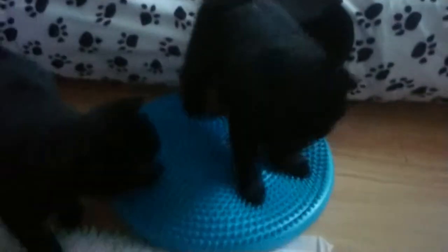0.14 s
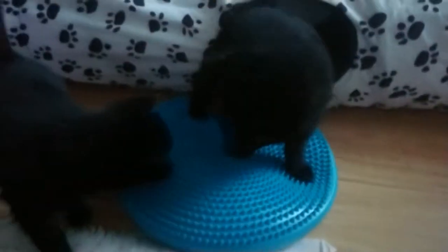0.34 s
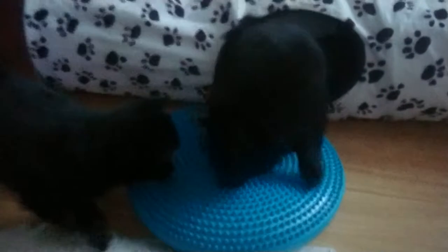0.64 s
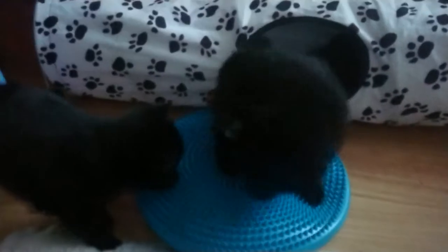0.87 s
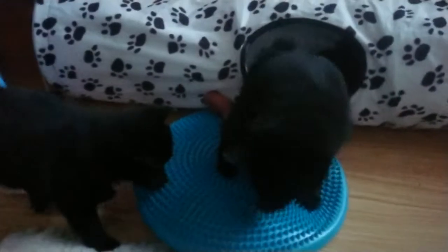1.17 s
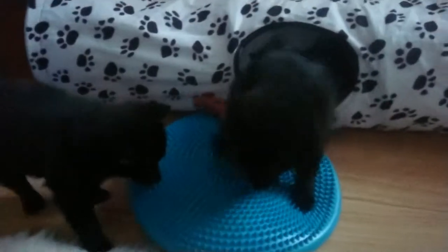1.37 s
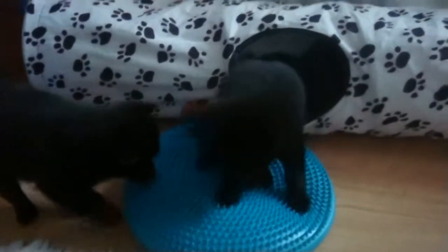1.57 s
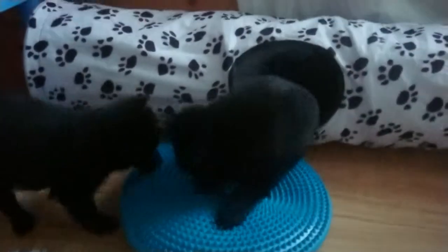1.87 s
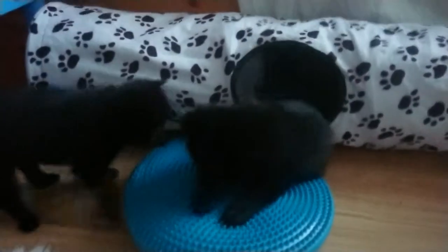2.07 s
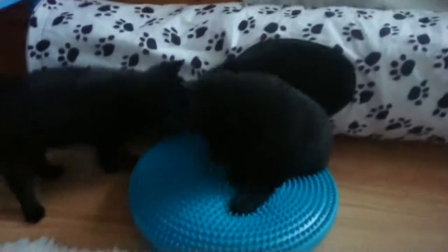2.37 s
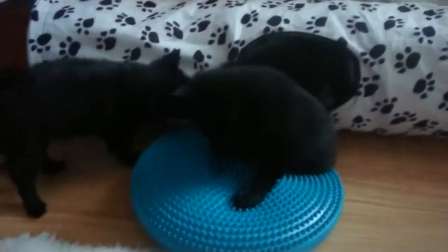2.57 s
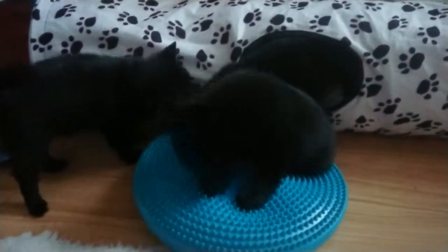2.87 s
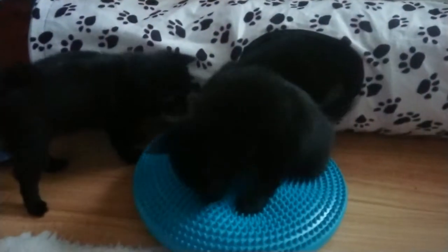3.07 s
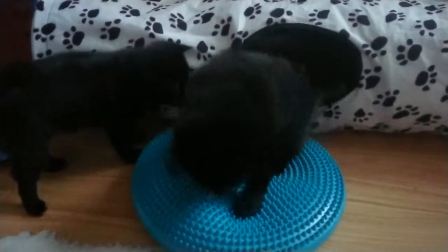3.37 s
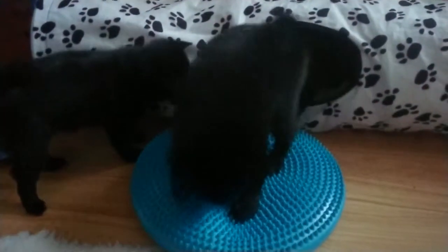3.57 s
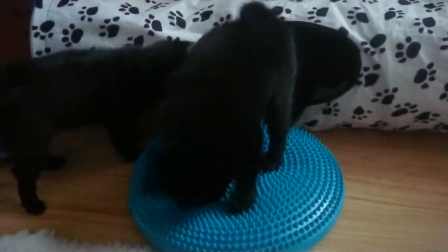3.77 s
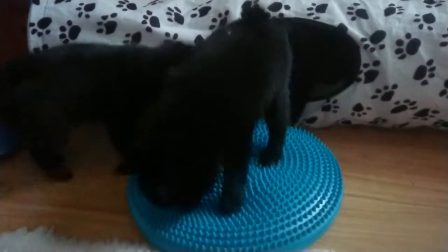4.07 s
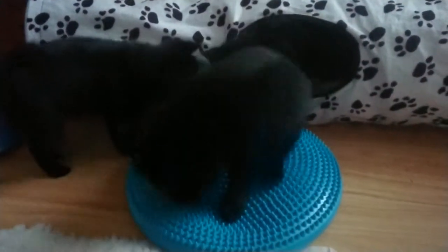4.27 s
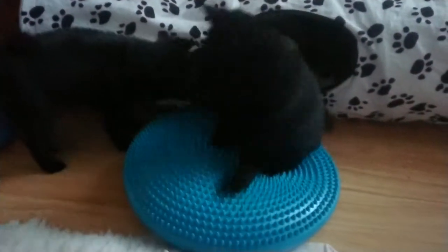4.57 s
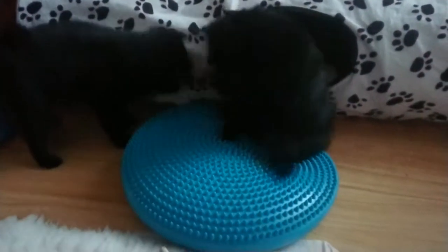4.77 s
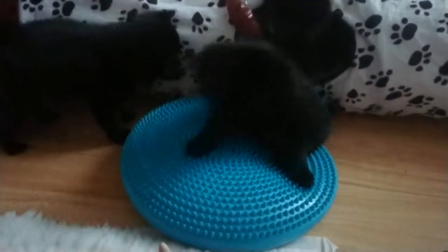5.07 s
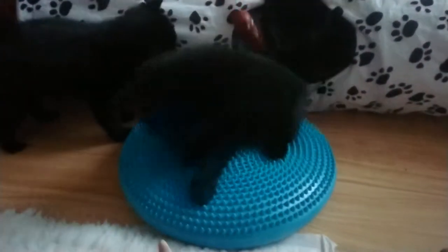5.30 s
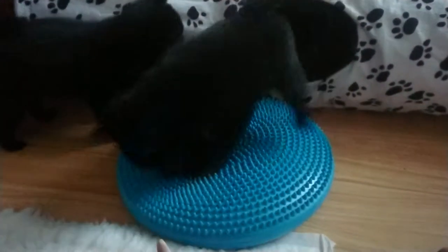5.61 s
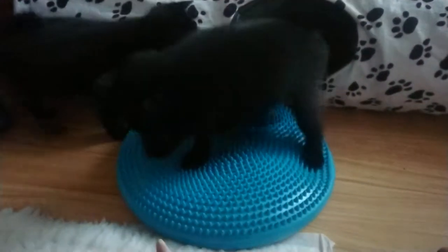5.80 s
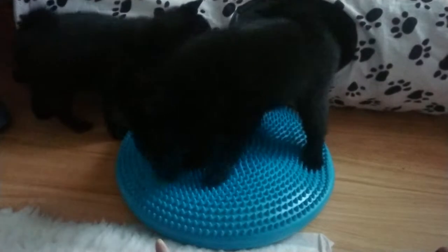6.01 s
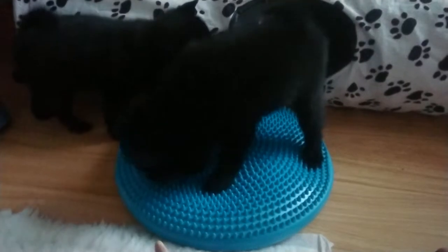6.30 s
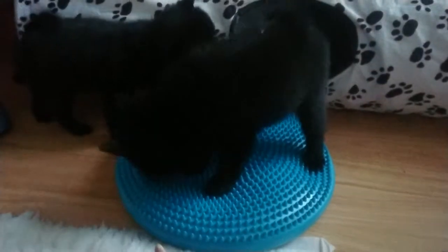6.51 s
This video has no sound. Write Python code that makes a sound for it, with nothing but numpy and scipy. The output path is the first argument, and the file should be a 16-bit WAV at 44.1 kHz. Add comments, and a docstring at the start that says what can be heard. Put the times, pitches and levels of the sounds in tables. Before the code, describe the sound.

Two kittens brush against a crinkly fabric tunnel, making uneven swells of rustling with small crisp snaps. Soft hollow thumps come in clusters as the tunnel wall gives way, and claws briefly rasp on a knobbly rubber cushion. The wooden floor gives a faint knock past the middle and a loud one near the end. The microphone is close, in a small quiet room.

```python
"""Cloth rustles and snaps, with soft thumps, as two small pets brush against a crinkly fabric tunnel.
Friction flips creases in the fabric, and its taut wall buckles and pushes the air. Claws rasp over
a knobbly rubber cushion; the wooden floor rings with a faint knock and, near the end, a loud one.
The small quiet room is heard through two close microphone ports."""
import sys
import numpy as np
from scipy import signal
from scipy.fft import rfft, irfft
from scipy.io import wavfile

SR = 44100
rng = np.random.default_rng(int(sys.argv[2]) if len(sys.argv) > 2 else 0)


def master_out(mix):
    """Clip the mix to full scale and print it as 16-bit PCM to the path in sys.argv[1]."""
    frames = np.transpose(np.atleast_2d(mix))
    ceiling = np.clip(frames, -1, 1)
    pcm = np.round(ceiling * 32767).astype(np.int16)
    wavfile.write(sys.argv[1], SR, pcm)


N = 293265

# the tunnel wall buckles under a paw or a flank: (time [s], relative level [dB], push width [ms])
BUCKLES = [(.024, -44, 1.5), (.278, -45, 1.6), (0.31, -44, 1.7), (.368, -47, 1.5), (.459, -46.5, 0.99),
           (1.227, -36, .7), (1.243, -30, .75), (1.292, -34.5, 0.93), (1.303, -27.5, .8), (1.64, -32, 0.89),
           (1.667, -32.5, 0.83), (1.705, -33.5, 1.14), (1.801, -30.5, 1.2), (1.814, -32, 0.88),
           (1.878, -27, 1), (1.888, -26, 0.84), (1.917, -30.5, .91), (1.946, -30.5, 0.77),
           (1.965, -30.5, 0.67), (2.212, -31, .68), (2.313, -22, 0.73), (2.327, -33, 1.4),
           (2.363, -26.5, 0.93), (2.404, -24, 0.88), (2.428, -30, 0.73), (2.507, -26.5, 0.94),
           (3.03, -28, 0.68), (3.055, -25.5, 0.95), (3.084, -41, 1.3), (3.374, -37, 0.81),
           (3.415, -35, 1.15), (3.454, -34, 1.2), (3.507, -32, 0.74), (3.697, -38.5, 1.15),
           (5.195, -31, 1.75), (5.232, -36.5, 2.1), (5.553, -29, 0.69), (5.629, -35, 1.4), (5.72, -29, 2.5),
           (5.732, -28, 2.6), (5.748, -32, 2.5), (6.219, -38.5, 1.1)]
# spectra of the cloth's bright crinkle and dull crumple: (frequency [Hz], gain [dB])
CRINKLE = [(200, -12), (700, -18.5), (1500, -9), (2400, -1), (3600, -4.5), (5300, 1.5), (7000, -1.5),
           (11000, 0.5), (16000, -6.5)]
CRUMPLE = [(150, -14.5), (450, -1), (660, -13), (830, -3), (1100, -6), (1500, -2.5), (2100, 2),
           (3000, -4.5), (4500, -6), (9000, -25)]


def from_db(db):
    """Amplitude ratio of a level in decibels."""
    return 10 ** (np.asarray(db) / 20)


def rms_one(x):
    """Normalisation to unit mean power."""
    return x / np.sqrt(np.mean(x ** 2) + 1e-20)


def in_time(points):
    """Linear interpolation of a curve at every sample."""
    return np.interp(np.arange(N) / SR, *np.transpose(points))


def at_bins(points, size):
    """Interpolation of a spectrum over log frequency, at the bins of a transform."""
    hz, value = np.transpose(points)
    return np.interp(np.log(np.fft.rfftfreq(size, 1 / SR) + 1), np.log(hz), value)


def add(track, s, sound):
    """Superposition of a sound on a track, from s seconds on."""
    start = max(round(s * SR), 0)
    span = track[..., start:start + sound.shape[-1]]
    span += sound[..., :span.shape[-1]]


def convolve(x, response):
    """Linear filtering: convolution with one or two impulse responses."""
    return signal.oaconvolve(np.atleast_2d(x), np.atleast_2d(response), axes=1)[:, :N]


def passband(x, order, hz, kind):
    """Filtering with a maximally flat pass band."""
    return signal.sosfilt(signal.butter(order, hz, kind, fs=SR, output="sos"), x)


def colour(x, points, size=8192):
    """Minimum-phase filtering: folding the cepstrum makes the given spectrum causal."""
    cepstrum = irfft(np.log(from_db(at_bins(points, size))))
    cepstrum[1:size // 2] *= 2
    cepstrum[size // 2 + 1:] = 0
    return convolve(x, irfft(np.exp(rfft(cepstrum))))


def ring(x, hz, t60):
    """Damped resonator: a unit impulse starts a decaying sine of height 1."""
    radius, angle = from_db(-60 / (t60 * SR)), 2 * np.pi * hz / SR
    return signal.lfilter([0, np.sin(angle)], [1, -2 * radius * np.cos(angle), radius ** 2], x + 1e-18)


def drift(per_s):
    """Random modulation of rms 1: straight lines between random values."""
    knots = rng.standard_normal(4000)
    return rms_one(np.interp(np.arange(N) / SR * per_s, np.arange(len(knots)), knots))


def clicks(per_s, spread_db):
    """Shot noise: random impulses of uneven size, scaled so that power is independent of rate."""
    sizes = from_db(spread_db * np.minimum(rng.exponential(1, N), 3)) * rng.choice([-1, 1], N)
    return sizes * (rng.random(N) < per_s / SR) / np.sqrt(per_s)


def stereo_noise(size):
    """Partial coherence: white noise, alike at both ports in the bass, nearly unrelated in the treble."""
    # left-right likeness of the sound field: (frequency [Hz], correlation [0-1])
    likeness = [(50, 0.45), (300, 0.85), (640, 0.6), (1400, 0.43), (3000, 0), (16000, 0.16)]
    alike = np.clip(at_bins(likeness, size), 0, 1)
    mid, side = rfft(rng.standard_normal((2, size)))
    return irfft(np.sqrt(1 + alike) * mid + np.sqrt(1 - alike) * side * [[1], [-1]], size)


def room_hush(level_db):
    """Stationary noise: the quiet room's background, strongest in the bass."""
    # spectrum of the hush: (frequency [Hz], relative level [dB])
    spectrum = [(20, -20), (35, -12), (51, 10), (63, -6), (80, 4.5), (105, -7.5), (140, -14.5), (250, -15),
                (450, -20.5), (700, -22), (2000, -18), (6000, -22), (16000, -59)]
    return from_db(level_db) * rms_one(colour(stereo_noise(N), spectrum))


def room(x, wet_db, gap_s, t60=0.15, size=16384):
    """Reverberation: reflections follow the direct sound after a gap and decay exponentially."""
    t = np.arange(size) / SR
    tail = stereo_noise(size) * from_db(-60 * t / t60) * (t > gap_s)
    return x + from_db(wet_db) * convolve(x, rms_one(tail) / np.sqrt(size))


def floor_knocks():
    """Modal vibration: a hard contact sets the floor boards ringing."""
    # blows on the floor: (time [s], level [dB])
    knocks = [(3.8721, -18), (6.2069, -3)]
    # modes of the boards: (frequency [Hz], gain [dB], t60 [s])
    modes = [(96, -40, 0.3), (350, -48, 0.051), (822, -34.5, 0.11), (884, -29.5, 0.019), (1020, -40, 0.044),
             (1380, -42, 0.057), (2150, -41, 0.095), (2470, -62, .05)]
    blows = np.zeros(N)
    for s, db in knocks:
        add(blows, s, from_db([db]))
    return sum(from_db(db) * ring(blows, hz, t60) for hz, db, t60 in modes)


def claw_rasps(fade_db, drag_db, ring_t60=.007, size=1024):
    """Repeated impact: a claw catches knob after knob, ringing ever weaker and mostly lower."""
    # rasps: (time [s], length [s], level [dB], start pitch [Hz], end pitch [Hz], catch rate [1/s])
    rasps = [(0.763, 0.11, -30.5, 2300, 2320, 75), (1.033, 0.071, -36, 2120, 1900, 47),
             (2.162, .06, -29, 2050, 1970, 127), (3.141, 0.096, -43, 2470, 2300, 99),
             (3.902, 0.08, -31.5, 1970, 1870, 100), (4.038, 0.049, -34.5, 1370, 1120, 80),
             (5.759, 0.032, -32, 1920, 1700, 146), (5.842, 0.039, -28, 1710, 1500, 100)]
    out = np.zeros(N)
    for s, length, db, start_hz, end_hz, per_s in rasps:
        chance = rng.standard_normal((20, 3))
        drags = rng.standard_normal((20, size)) * np.linspace(1, 0, size) ** 2
        for k, (late, loud, sharp) in enumerate(chance):
            done = k / per_s / length
            if done < 1:
                hz = (start_hz + done * (end_hz - start_hz)) * (1 + .04 * sharp)
                catch = ring(signal.unit_impulse(size) + from_db(drag_db) * drags[k], hz, ring_t60)
                add(out, s + (k + 0.0964 * late) / per_s, catch * from_db(db - fade_db * done + 2 * loud))
    return passband(out, 2, 900, "high")


def trembling(tremble_db, strain_db=-20, build_s=0.014, settle_s=0.023):
    """Power addition: the wall's amplitude from rubbing and from the strain around each buckle."""
    t, power = np.arange(N) / SR, from_db(tremble_db) ** 2
    for s, db, _ in BUCKLES:
        away = np.maximum((s - t) / build_s, (t - s) / settle_s)
        near = away < 10
        power[near] += from_db(db + strain_db) ** 2 * np.exp(-away[near])
    return np.sqrt(power)


def wall_thumps(tremble_db, buckle_db, leak_hz, flutter_hz):
    """Buckling: the trembling wall gives way, pushing and pulling the air once and exciting resonances."""
    # resonances of the tunnel and the room: (frequency [Hz], gain [dB], t60 [s])
    modes = [(75, 5, 0.94), (146.7, 6, 0.6), (258, -3.5, .22), (364, -1.5, 0.14), (404.3, -3.5, 0.075),
             (818, 13, 0.16)]
    out, ms = np.zeros(N), np.arange(-441, 442) / SR * 1000
    for s, db, width_ms in BUCKLES:
        u = ms / width_ms
        add(out, s + ms[0] / 1000, -from_db(db + buckle_db) * u / (1 + u * u / 5) ** 3)
    flutter = passband(clicks(per_s=260, spread_db=4.5), 4, flutter_hz, "low")
    out += rms_one(flutter) * trembling(tremble_db)
    out = passband(out, 2, leak_hz, "high")  # the deepest part leaks from the open tunnel
    boom = sum(from_db(db) * 2 * np.log(1000) / (t60 * SR) * ring(out, hz, t60) for hz, db, t60 in modes)
    return out + boom


def rubbing(edge_db=19.5, roundness=1.53):
    """Incoherent sum: leaning and strokes add in power to give crinkle, crumple and tremble levels."""
    # steady rustle of a body leaning on the tunnel: (time [s], level [dB])
    leaning = [(0, -54), (.45, -52), (.95, -47.5), (1.35, -51), (1.66, -39.5), (2.05, -38.5), (2.45, -40.5),
               (2.62, -47), (3.08, -50), (3.27, -45.5), (3.72, -45.5), (3.82, -55.5), (4.15, -56.5),
               (4.55, -58.5), (5.02, -43), (5.7, -43.5), (5.8, -48), (6.65, -53.5)]
    # a paw or a flank brushes the cloth: (peak time [s], swell [s], fade [s], crinkle level [dB],
    # crumple re crinkle [dB], wall tremble re crinkle [dB])
    strokes = [(.025, 0.061, 0.08, -43.5, -31, -29), (.21, 0.11, 0.054, -39.5, -13.5, -21),
               (.4, 0.29, 0.19, -56.5, -22, -6.5), (.54, 0.16, 0.13, -43.5, -31, -24),
               (.78, 0.11, 0.15, -39, -9, -17.5), (.86, 0.067, .06, -41.5, 0, -22),
               (.96, .07, .07, -51, -12, -5.5), (1.12, 0.12, 0.34, -44.5, -3.5, -13),
               (1.582, 0.24, 0.063, -39, -14, -17), (2.178, 0.1, 0.15, -34.5, -13.5, -31),
               (2.369, 0.26, .1, -36.5, -8.5, -25), (2.51, 0.038, 0.036, -39, -3, -17),
               (2.659, .05, 0.06, -46.5, -1, -20), (2.859, 0.069, 0.14, -41, -10, -16.5),
               (3.212, .08, 0.043, -48, -9.5, -28), (3.381, .17, 0.092, -41, -5.5, -19),
               (3.75, 0.038, 0.087, -46.5, -8, -18), (3.89, 0.034, 0.2, -45, -4.5, -11),
               (4.28, .11, 0.13, -50.5, -6.5, -11), (4.43, 0.11, 0.1, -46.5, -5, -10.5),
               (4.6, 0.012, .09, -46.5, -8, -13.5), (4.761, 0.16, .07, -42.5, -6.5, -25),
               (4.898, 0.026, 0.043, -43.5, -21, -27), (5.139, 0.17, 0.066, -34, -7.5, -16),
               (5.281, 0.021, 0.077, -44.5, -10, -27), (5.459, .03, 0.2, -39.5, -11.5, -12),
               (5.681, 0.2, .11, -37.5, -10.5, -6), (5.859, 0.035, 0.05, -42, -7, -7),
               (5.988, 0.073, 0.27, -45, -9, -12.5), (6.12, 0.02, 0.059, -42, -11, -14),
               (6.219, 0.017, 0.082, -39.5, -6, -13), (6.52, 0.24, .06, -51, -2.5, -13.5)]
    t = np.arange(N) / SR
    power = from_db(in_time(leaning) + np.array([[0], [-6], [-16.5]])) ** 2  # crinkle, crumple, tremble
    for s, swell_s, fade_s, db, crumple_db, tremble_db in strokes:
        away = np.maximum((s - t) / swell_s, (t - s) / fade_s)
        near = away < 2
        stroke_db = db - edge_db * away[near] ** roundness
        power[:, near] += from_db(stroke_db + np.array([[0], [crumple_db], [tremble_db]])) ** 2
    return 10 * np.log10(power)


def crack(decay_ms, size=2048):
    """Snap-through: one crease flips and radiates a brief burst of noise."""
    u = np.arange(size) / SR * 1000 / decay_ms
    return stereo_noise(size) * np.exp(-u) * (.5 + u)


def crease_snaps(rubbing_db, large_db, body_db, small_per_s=40):
    """Elastic release: large creases flip singly and shake the cloth; small ones flip at random."""
    # large creases: (time [s], relative level [dB], decay [ms])
    snaps = [(0.031, -27.5, 0.84), (0.214, -27.5, 0.44), (0.46, -39, 0.74), (0.527, -33, 2.8),
             (0.8511, -21.5, 1.1), (1.619, -29, .69), (1.741, -22, .4), (2.016, -41, 0.45),
             (3.437, -24, 0.69), (3.642, -24.5, .8), (3.846, -33.5, .54), (3.8717, -21, 2.4),
             (3.874, -23.5, 1.9), (3.881, -32, .84), (3.888, -32, 1.5), (4.1995, -33.5, 1),
             (4.243, -31, 0.76), (4.289, -26.5, 0.48), (4.423, -28, 0.67), (4.438, -30, .78),
             (4.563, -36.5, 1), (4.5899, -32.5, 1.2), (5.835, -30, 0.67), (6.127, -27, 2.3),
             (6.209, -28.5, 3.7), (6.374, -32.5, 1.9), (6.644, -27, .58)]
    out = np.zeros((2, N))
    for s, db, decay_ms in snaps:
        add(out, s, from_db(db + large_db) * crack(decay_ms))
    for i in rng.integers(0, N, round(small_per_s * N / SR)):
        small_db = rubbing_db[i] + 5.5 + 2 * rng.standard_normal()
        add(out, i / SR, from_db(small_db) * crack(decay_ms=0.32))
    return colour(out, CRINKLE) + from_db(body_db) * colour(out, CRUMPLE)


def folds(flips, low_hz, high_hz, wander_db, count=12):
    """Impulse excitation: each flip sounds one fold, with its own octave band and wandering level."""
    fold, out = rng.integers(0, count, N), 0
    for k, hz in enumerate(np.geomspace(low_hz, high_hz, count)):
        octave = [hz / np.sqrt(2), min(hz * np.sqrt(2), .45 * SR)]
        burst = passband(crack(decay_ms=np.sqrt(500 / hz)), 1, octave, "band")
        voice = rms_one(burst) * np.sqrt(hz)
        out = out + convolve(flips * (fold == k) * from_db(wander_db * drift(per_s=22)), voice)
    return rms_one(out)


def cloth_rustle(crinkle_db, crumple_db, per_s, crowding, catch_db, hiss_db, bright_db):
    """Stick-slip friction: cloth catches and lets go over a hiss; harder rubbing flips more creases."""
    flip_rate = per_s * from_db(crowding * (crinkle_db - np.median(crinkle_db)))
    catching = from_db(catch_db * drift(per_s=130))
    fine = folds(clicks(flip_rate, spread_db=3.0), low_hz=2020, high_hz=14900, wander_db=5.0)
    fine = rms_one(catching * (fine + from_db(hiss_db) * stereo_noise(N)))
    coarse = folds(clicks(flip_rate, spread_db=2.0), low_hz=482, high_hz=2640, wander_db=3.0)
    crinkle = colour(fine * from_db(crinkle_db + bright_db), CRINKLE)
    crumple = rms_one(colour(coarse * catching, CRUMPLE)) * from_db(crumple_db)
    return crinkle + crumple


def scene():
    """Superposition: cloth, thumps, claws and knocks reverberate in the room, over its hush."""
    crinkle_db, crumple_db, tremble_db = rubbing()
    cloth = cloth_rustle(crinkle_db, crumple_db, per_s=2600, crowding=.6,
                         catch_db=1.26, hiss_db=-1, bright_db=2.5)
    cloth = room(cloth, wet_db=-13, gap_s=.004)
    thumps = wall_thumps(tremble_db, buckle_db=4.5, leak_hz=102, flutter_hz=411)
    thumps = room(thumps, wet_db=-9.5, gap_s=0.0114)
    hush = room_hush(level_db=-61.5)
    contacts = floor_knocks() + claw_rasps(fade_db=10.5, drag_db=-22.5)
    contacts = contacts + crease_snaps(crinkle_db, large_db=-3.5, body_db=-4)
    return hush + room(contacts, wet_db=-6, gap_s=0.0062) + thumps + cloth


def record(dry):
    """Port resonance colours each channel; the right starts dull, and both are band-limited."""
    # responses of the two ports: (frequency [Hz], gain [dB])
    left_port = [(500, 0.5), (1800, -1.5), (4000, 3), (5200, 2.5), (5850, 6), (6500, 2.5), (8000, 2.5),
                 (10500, -1), (12000, -10.5), (14000, 2.5), (15700, -11)]
    right_port = [(500, -3.5), (1000, -4), (2100, 2), (4000, 5), (5350, 3.5), (5950, -9), (6600, 0.5),
                  (9500, 1), (11300, -0.5), (13700, 10.5), (15700, 6)]
    # the treble on the right opens up: (time [s], level [dB])
    right_treble = [(0, -11.5), (.45, -9), (.6, -5.5), (1.05, -3.2), (1.3, -2.6)]
    left, right = colour(dry[0], left_port), colour(dry[1], right_port)
    muffled = passband(right, 1, 3000, "low")
    right = muffled + from_db(in_time(right_treble)) * (right - muffled)
    heard = passband(np.vstack([left, right]), 4, 40, "high")
    return signal.sosfilt(signal.ellip(12, .2, 80, 15900, fs=SR, output="sos"), heard)


dry = scene()
out = record(dry)
master_out(out)
```